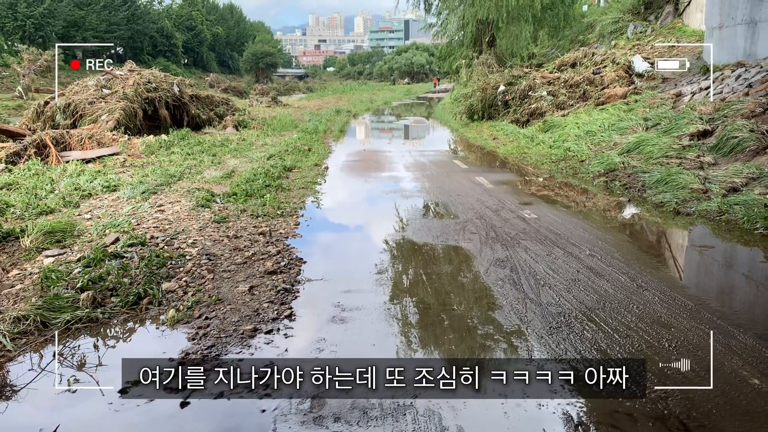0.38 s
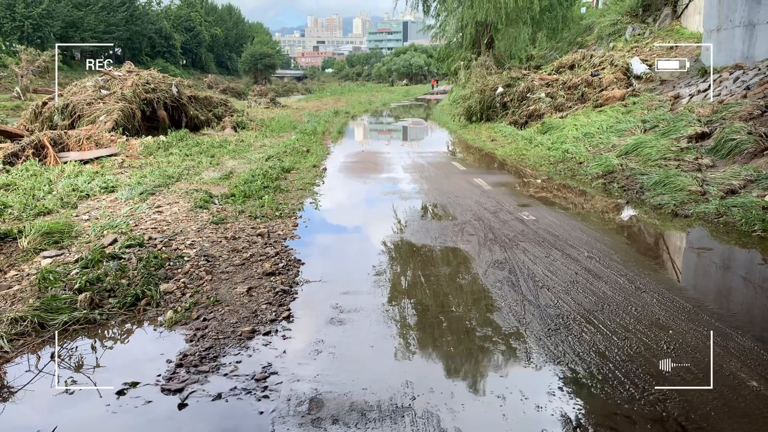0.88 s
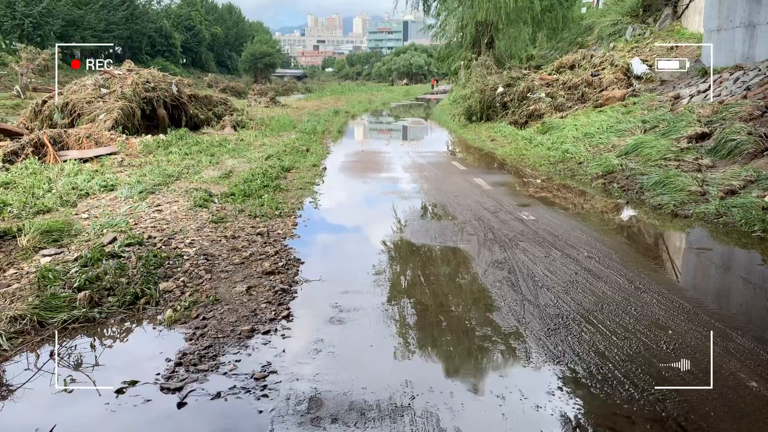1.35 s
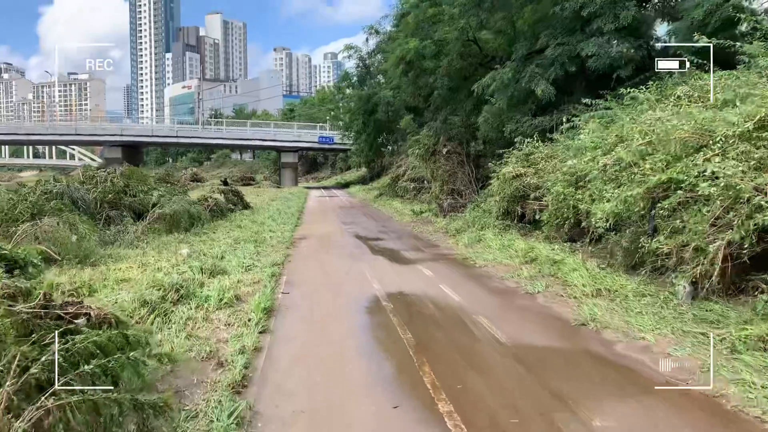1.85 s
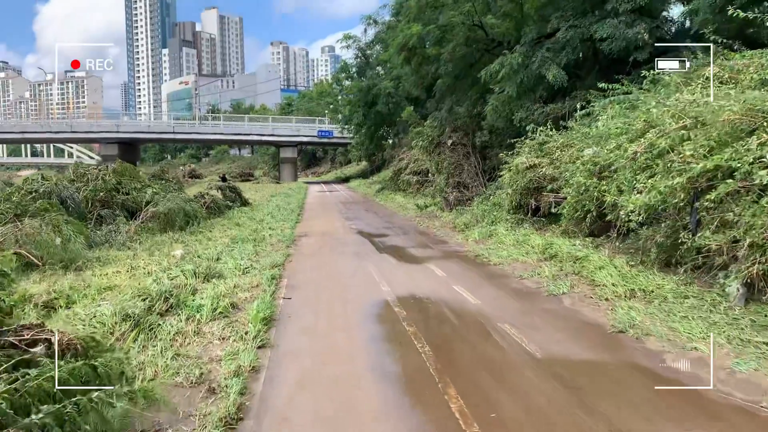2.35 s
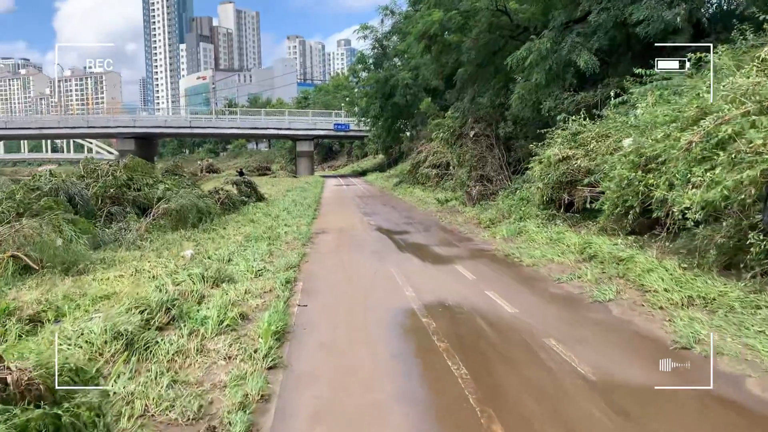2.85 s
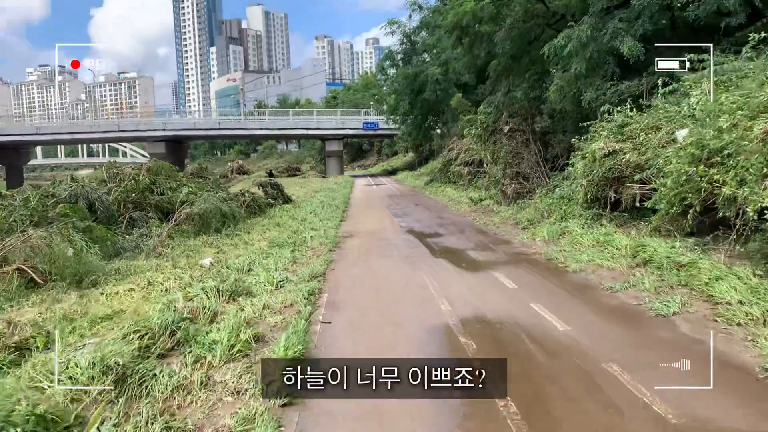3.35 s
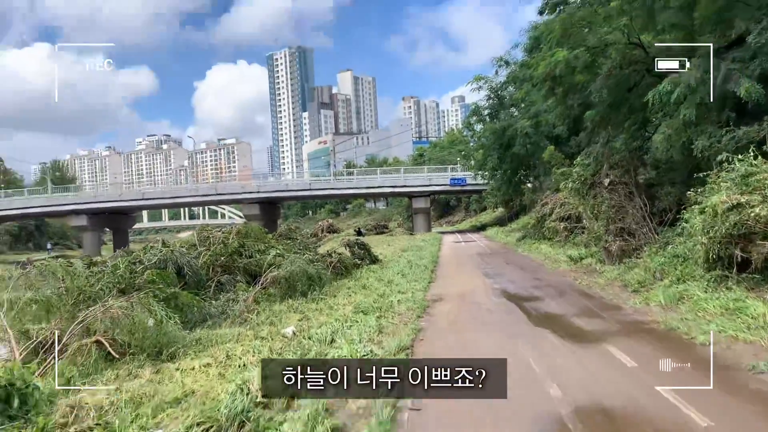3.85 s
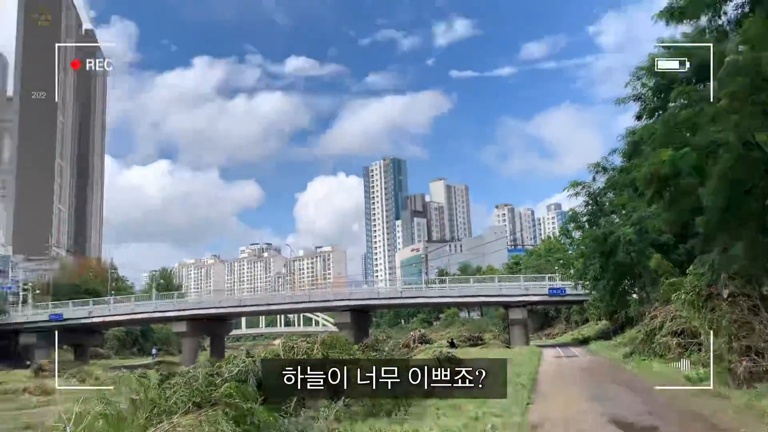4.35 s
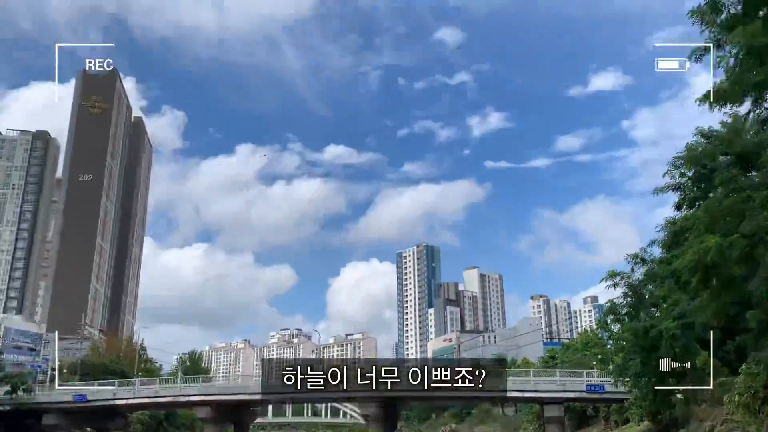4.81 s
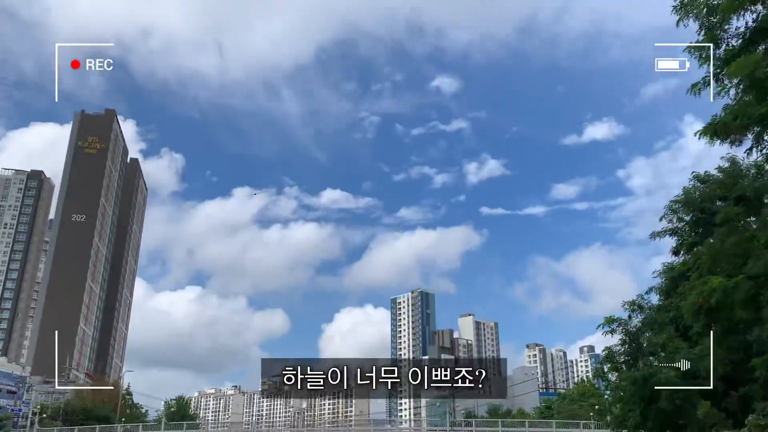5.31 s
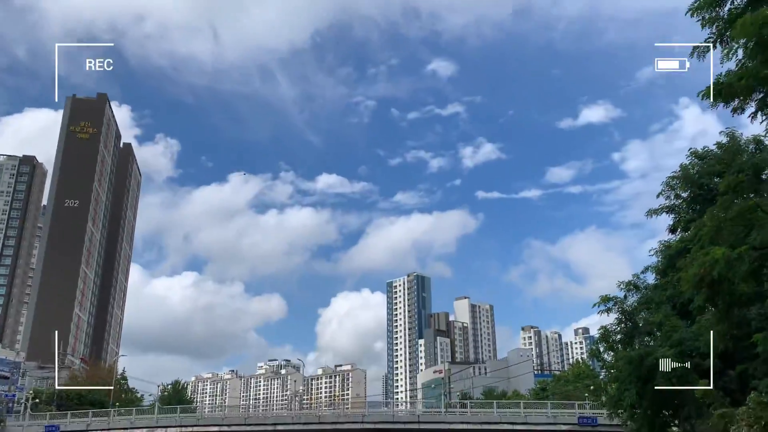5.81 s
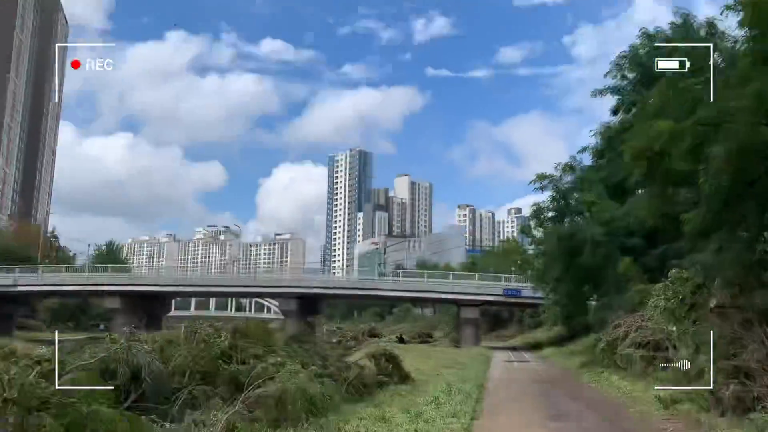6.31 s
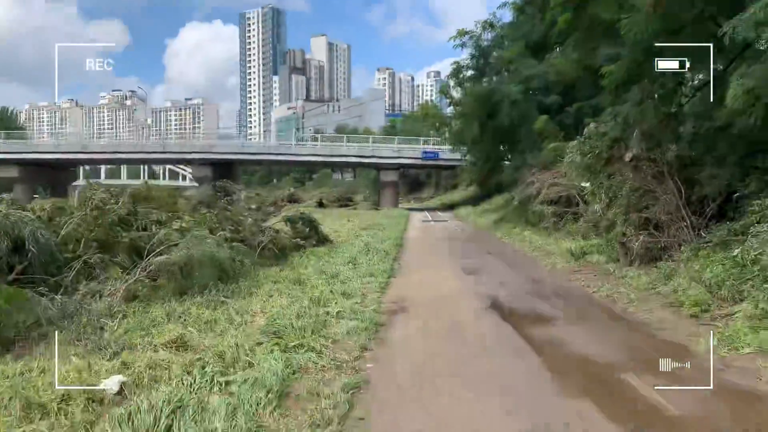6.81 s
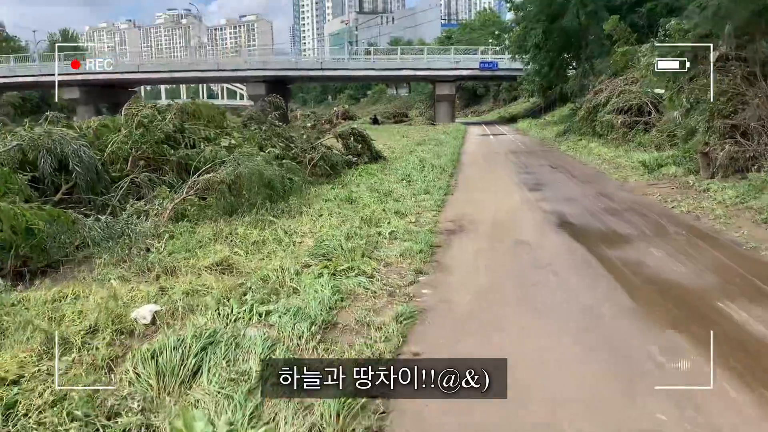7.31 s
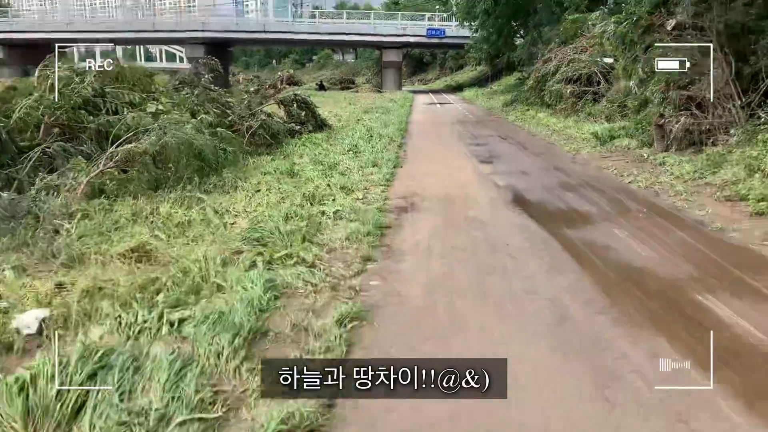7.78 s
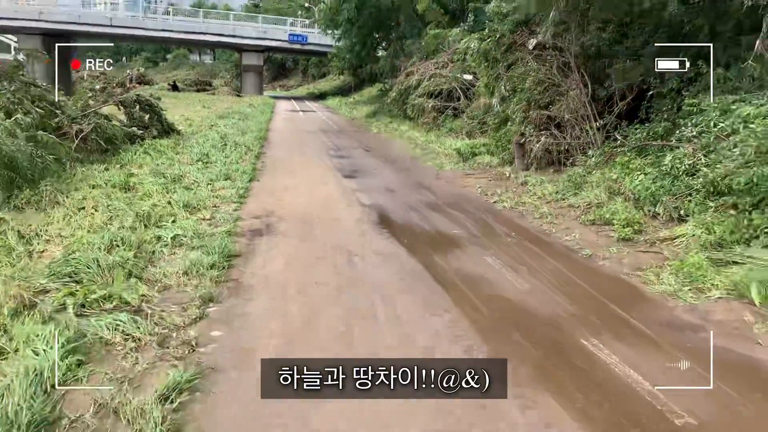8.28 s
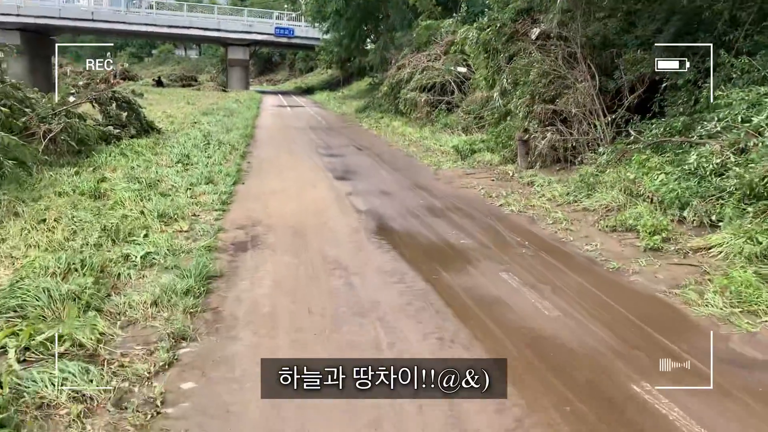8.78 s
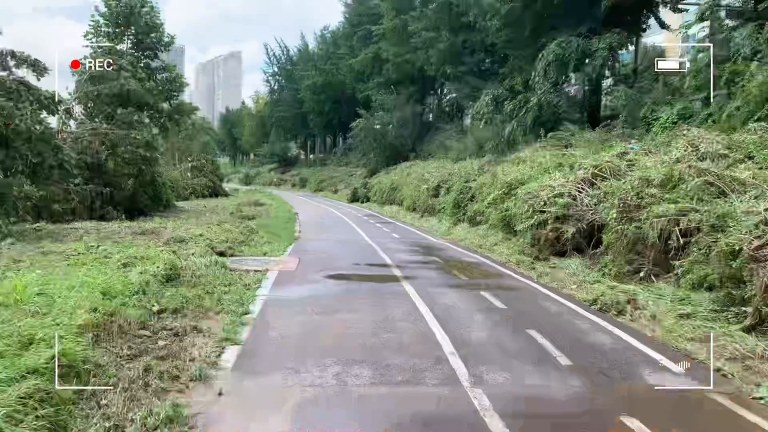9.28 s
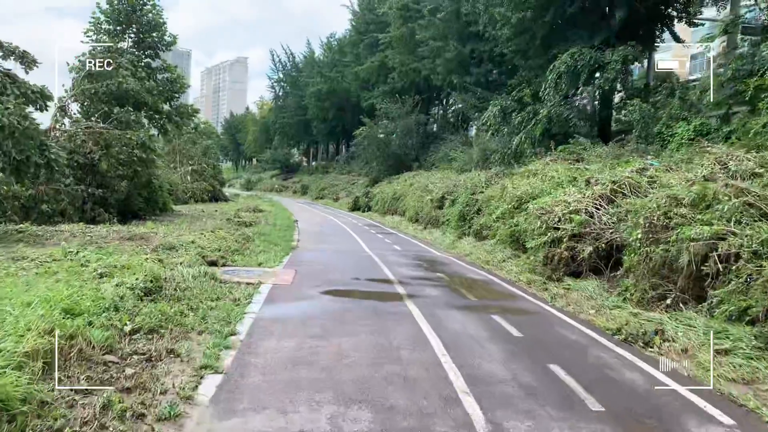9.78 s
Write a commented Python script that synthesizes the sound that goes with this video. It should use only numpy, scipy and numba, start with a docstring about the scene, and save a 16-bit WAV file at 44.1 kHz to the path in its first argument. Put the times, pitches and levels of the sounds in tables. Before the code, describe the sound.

Outdoors on a tree-lined riverside path, a dense cicada chorus drones high and bright, one nearer singer throbbing rapidly. Deep town and traffic rumble swells softly beneath. A gritty shoe scuff opens the scene, with lighter ones soon after. A tiny gap at 1.5 seconds changes the tone slightly; at 9.3 the cicadas vanish, leaving low rumble and thin leaf rustle. One handheld microphone, same in both channels.

```python
"""A tree-lined riverside path near town: three shots joined by short silences, one microphone for both channels.
In the first two a cicada chorus drones from the trees, one singer near enough for its buzz to throb:
trains of clicks ring resonances, and echoes blur the far singers. Bands of noise make the town's rumble,
a faint hum in the first shot and grit under a shoe close by. In the last shot only the rumble
and a thin rustle of leaves remain."""
import sys
import numpy as np
from scipy import signal
from scipy.fft import rfft, irfft
from scipy.io import wavfile
from scipy.ndimage import uniform_filter1d
from numba import njit

SR = 44100
rng = np.random.default_rng(int(sys.argv[2]) if len(sys.argv) > 2 else 0)


def log_audio(samples):
    """Write samples as a 16-bit WAV file to the path given in sys.argv[1]."""
    # one column per channel
    frames = np.atleast_2d(samples).T
    # limit to full scale, then quantise
    limited = np.clip(frames, -1, 1)
    pcm = np.round(limited * 32767).astype(np.int16)
    wavfile.write(sys.argv[1], SR, pcm)


def makeup_ratio(level_db):
    """Linear amplitude ratio for a level in decibels (20 dB per factor of ten)."""
    decades = np.asarray(level_db, float) / 20
    return 10 ** decades


N = 436590
T = np.arange(N) / SR
F = np.fft.rfftfreq(N, 1 / SR) + 1e-3  # Hz, kept above zero for the logarithm

# The three shots: (start [s], end [s], fade-out [s])
SHOTS = [(0, 1.5353, .0004), (1.5477, 9.273, .005), (9.2795, 9.9, .0004)]
# The walker on the path: (time [s], chorus level [dB], microphone lifted from path to sky [0-1])
WALKER = [(0, 1.5, 0.24), (.5, 1, 0.25), (1.53, 0, 0.27), (1.55, -1, 0.27), (2.6, -1, 0.2),
          (3.1, -0.5, 0.3), (3.6, 0.5, 0.9), (4.1, 0.3, 1), (5.2, 0, 0.96), (6.2, 0, 1), (6.7, 1, 0.84),
          (7.2, -0.5, 1), (7.7, -1, 0.84), (8.2, -0.8, 0.03), (8.8, -1.5, 0), (9.27, -0.3, 0)]
# Rings of a cicada's drum and hollow belly, before the walker's changes: (centre in first shot [Hz],
# centre in second [Hz], level in first [dB], level in second [dB], change with microphone to the sky [dB])
CICADA_RINGS = [(3820, 3558, -43.5, -41.5, -6.5), (4650, 4500, -42, -39.5, 0), (6100, 6110, -38.5, -37, 1),
                (7350, 7570, -42.5, -43.5, -2.5), (8020, 8150, -45.5, -49, -1),
                (9620, 9180, -40.5, -44.5, -0.5), (10770, 10200, -47, -44, -0.5),
                (13200, 13070, -56.5, -55, 0.5)]
# Width of each ring, for one pass of the resonance: (first shot [Hz], second shot [Hz])
RING_WIDTHS = [(1190, 545), (950, 840), (1720, 2060), (900, 1100), (350, 500), (1600, 2700), (1200, 2600),
               (3200, 2000)]
# The near singer's share of the drone's power, before each ring's gain: (time [s], share [0-1])
NEAR_SHARE = [(0, 0.26), (1.5, 0.27), (1.6, 0.2), (4, 0.28), (5.5, 0.33), (7, 0.21), (8, 0.16), (9.3, 0.16)]
# How far the near singer stands out, as a gain on that share, one per ring: (gain [dB])
NEAR_GAINS = [-5.5, 3, 0.5, 3, -3, -3, -1, -2]
# A shriller singer joins for a while: (start [s], length [s], level [dB], centre [Hz])
SHRILL_SINGER = [(.1, 1.4, -50, 8240), (6.796, 1.3, -43.5, 8310)]
# Grit under a shoe: (time halfway up the rise [s], peak level [dB], centre [Hz], width [Hz], rise [s])
SCUFFS = [(-.005, -38, 2200, 300, .012), (-.005, -41, 2430, 250, .011), (-.003, -43, 1830, 250, .014),
          (.03, -45, 2250, 450, .011), (.648, -50, 1800, 500, .004), (.66, -48, 2300, 600, .005),
          (.67, -50, 2000, 500, .004), (.776, -50, 2200, 1000, .007), (.785, -47, 1300, 1500, .0015),
          (8.136, -46.5, 1620, 400, .0035), (8.143, -50, 880, 250, .005)]
# Town level in each shot, before swells, sky and breeze:
# (deep drone [dB], upper drone [dB], low roar [dB], high roar [dB])
TOWN_LEVELS = [(-36.5, -34, -37, -46.5), (-35, -40, -38.5, -50.5), (-36.5, -46.5, -41.5, -47)]
# Brief swells of the drones and low roar: (time [s], peak level added [dB],
# time from peak to 1/e of power [s], layer [0 deep drone, 1 upper drone, 2 low roar])
DRONE_AND_ROAR_SWELLS = [(.96, -33, 0.12, 0), (1.6, -36, .12, 0), (3.1, -27, 0.14, 0),
                         (3.73, -30, 0.067, 0), (4.1, -37, 0.16, 0), (5.65, -29.5, 0.11, 0),
                         (6.1, -26.5, 0.14, 0), (6.9, -44, 0.44, 0), (7.8, -28, 0.13, 0),
                         (8.282, -29, 0.032, 0), (9.07, -43, 0.058, 0), (.1, -38, 0.27, 1),
                         (1.34, -50, 0.1, 1), (1.85, -37, 0.62, 1), (3.3, -35.5, 0.11, 1),
                         (4.1, -30, 0.15, 1), (4.72, -33.5, 0.11, 1), (5.2, -31.5, 0.14, 1),
                         (6.3, -32, 0.069, 1), (7.3, -36, 0.13, 1), (7.86, -39, 0.11, 1),
                         (8.5, -41, 0.1, 1), (8.862, -37.5, 0.1, 1), (9.3, -37, 0.066, 1),
                         (9.69, -35.5, 0.067, 1), (7.3, -41.5, 0.62, 2), (9.2, -42.5, 0.079, 2)]
# Engine drones: (centre in first, second and third shot [Hz], width [Hz])
ENGINE_DRONES = [(52.8, 50.6, 54.3, 16.7), (84, 74, 86, 25.4)]
# Colour of roar and rustle, and near 3050 Hz in the second shot the cicadas' lower skirt,
# one list per shot: (frequency [Hz], gain [dB])
ROAR_COLOURS = [
    [(59, -34), (100, -10), (180, -2), (285, -13.5), (409, -14), (477, -19.5), (639, -23), (900, -29.5),
     (1100, -35), (2000, -36), (2800, -43), (3640, -51), (6160, -120)],
    [(59, -35), (100, 2.5), (146, -5), (177, -5), (366, -14.5), (540, -19.5), (1010, -23), (1500, -28.5),
     (2000, -29.5), (2300, -32.5), (2600, -33), (2800, -31), (3050, -25), (3300, -30), (3640, -33),
     (6160, -120)],
    [(59, -37.5), (100, -2.5), (118, -12.5), (172, -16.5), (328, -23.5), (412, -33), (467, -22.5),
     (638, -32), (679, -28.5), (890, -28.5), (1300, -32), (1900, -36.5), (2300, -42), (3100, -44),
     (3900, -41.5), (4850, -42), (5150, -47), (6500, -45), (7000, -50), (7900, -50), (8100, -42),
     (8800, -47), (10500, -54), (11300, -64), (14500, -64)],
]
# Leaves in the last shot as the breeze drops: (time [s], change of the high roar [dB])
BREEZE = [(9.28, -2.5), (9.45, -1), (9.6, -4.5), (9.9, -3.5)]
# A machine somewhere near the first shot: (centre [Hz], width [Hz], level [dB])
MACHINE_HUM = [(151, 34, -44.5), (176, 10.4, -47), (398, 5.5, -52.5)]
# Overall response, weak in deep bass, with two narrow treble notches: (frequency [Hz], gain [dB])
RESPONSE = [(20, -23), (38, -3), (50, 0), (11000, 2.5), (11500, -0.5), (11650, -18), (11780, -43),
            (11900, -40), (12020, -24), (12150, -10), (12500, -1), (14300, 1), (14550, 0), (14750, -60),
            (15200, -60), (15300, -16), (15690, -8)]

THROB_HZ, RIBS = 42.78, 6  # muscle pulls per second, drum ribs buckling in each pull


def cicadas():
    """Far singers merge to a hiss combed by the wet path; the near one keeps its throb in every ring."""
    near = clicks(THROB_HZ, wander=0.0016, jitter=0.00014, lean=0.2)
    crowd = 0
    for pull_hz in THROB_HZ * rng.uniform(0.8, 1.25, size=8):
        crowd = crowd + makeup_ratio(0.48 * walk(2.6)) * clicks(pull_hz, wander=0.0051, jitter=0.00002, lean=0.43)
    common_swell = walk(5.6)
    chorus_db, sky = curves(WALKER)
    near_share = curves(NEAR_SHARE)[0]
    chorus = 0
    for row, width, near_db in zip(CICADA_RINGS, RING_WIDTHS, NEAR_GAINS):
        first_hz, second_hz, first_db, second_db, sky_db = row
        # Each ring gets echoes of its own
        far = unit(echoes(crowd, seconds=0.023, rate=7, count=5) + makeup_ratio(-3.5) * rng.standard_normal(N))
        far = wet_path(far)
        share = np.clip(near_share * makeup_ratio(near_db), 0, 1)
        drone = np.sqrt(1 - share) * far + np.sqrt(share) * scatter(near, seconds=0.0077)
        hz = by_shot([first_hz, second_hz]) * (1 + 0.009 * walk(1.143))
        level_db = by_shot([first_db, second_db]) + chorus_db + sky_db * sky
        flutter_db = 0.15 * walk(1.6) + 0.5 * common_swell + 0.14 * walk(18)
        chorus = chorus + makeup_ratio(level_db + flutter_db) * unit(ring(drone, hz, by_shot(width)))
    chorus = chorus + shrill_singer(far)
    # Small drums radiate little below 2860 Hz
    high_pass = signal.butter(4, 2860, "high", fs=SR, output="sos")
    return signal.sosfilt(high_pass, chorus) * (T < SHOTS[1][1])


def clicks(hz, wander, jitter, lean):
    """One singer: drum ribs buckle in turn, the first hardest, once for each pull of the muscle."""
    phase = np.cumsum(hz * RIBS * (1 + wander * walk(2)) / SR) + rng.random() * RIBS
    at = np.flatnonzero(np.diff(np.floor(phase)))
    size_chance, time_chance = rng.standard_normal((len(at), 2)).T
    rib = np.floor(phase[at + 1]) % RIBS
    size = np.exp(-lean * rib) * makeup_ratio(2.0 * size_chance)
    sample = np.clip(at + jitter * SR * time_chance, 0, N - 1).astype(int)
    out = np.zeros(N)
    np.add.at(out, sample, size)
    return unit(out)


def echoes(x, seconds, rate, count):
    """Echo patterns of bank and trees trade places as the walker moves: strands come and go, the sum holds level."""
    t = np.arange(int(4 * seconds * SR)) / SR
    weights = np.array([walk(rate) for _ in range(count)])
    paths = []
    for _ in range(count):
        tail = rng.standard_normal(len(t)) * np.exp(-t / seconds)
        paths.append(signal.oaconvolve(x, tail)[:N])
    return unit(np.sum(weights * paths, axis=0) / np.sqrt(np.sum(weights ** 2, axis=0)))


def wet_path(far):
    """The wet path mirrors the chorus: a delayed copy combs it, drifting as the walker moves."""
    delay = rng.uniform(0.002, 0.004) + 0.00014 * walk(4.5)  # s
    return unit(far + makeup_ratio(-7) * np.interp(T - delay, T, far))


def scatter(x, seconds):
    """Leaves and ground smear each click into a short tail of fresh noise."""
    keep = np.exp(-1 / (seconds * SR))
    power = signal.lfilter([1], [1, -keep], x ** 2)
    return unit(np.sqrt(power) * rng.standard_normal(N))


def shrill_singer(far):
    """A shriller singer rings the far hiss in one narrow band, fading in and out."""
    out = 0
    for start, length, db, hz in SHRILL_SINGER:
        fade = np.clip(np.minimum(T - start, start + length - T) / 0.2, 0, 1)  # 0.2 s each way
        out = out + makeup_ratio(db) * fade * unit(ring(far, hz, 420))
    return out


def scuffs():
    """Grit close to the microphone: short bursts of ringing noise, quick to rise and slower to fade."""
    out = 0
    for s, db, hz, width, rise in SCUFFS:
        u = np.clip((T - s) / rise + 0.5, 0, 20)
        out = out + makeup_ratio(db) * u * np.exp(1 - u) * unit(ring(rng.standard_normal(N), hz, width))
    return out


def traffic():
    """Town rumble: brief swells add power to the engine drones and to the low roar."""
    deep_db, upper_db, low_db, high_db = (by_shot(column) for column in np.transpose(TOWN_LEVELS))
    low_db = low_db - 1.5 * curves(WALKER)[1]  # softer as the microphone faces the sky
    power = [makeup_ratio(deep_db) ** 2, makeup_ratio(upper_db) ** 2, makeup_ratio(low_db) ** 2]
    for s, db, length, layer in DRONE_AND_ROAR_SWELLS:
        swell = makeup_ratio(db) ** 2 * np.exp(-((T - s) / length) ** 2)
        power[round(layer)] = power[round(layer)] + swell
    high_db = high_db + curves(BREEZE)[0] * (T > SHOTS[2][0])
    low_roar = roar(np.sqrt(power[2]), 113 * 2 ** np.arange(0, 2.1, 0.5))
    high_roar = roar(makeup_ratio(high_db), 640 * 2 ** np.arange(0, 4.6, 0.5))
    return engine_drones(power) + low_roar + high_roar


def engine_drones(power):
    """Engines on the bridge blur to two low drones: noise through narrow, wandering resonances."""
    out = 0
    for (*shot_hz, width), drone_power in zip(ENGINE_DRONES, power):
        hz = by_shot(shot_hz) * (1 + 0.036 * walk(2.0))
        out = out + np.sqrt(drone_power) * unit(ring(rng.standard_normal(N), hz, width))
    return out


def roar(gain, centres_hz):
    """Tyres, water and leaves: half-octave-spaced noise bands flicker alone, coloured for each shot."""
    bands = 0
    for hz in centres_hz:
        flicker = makeup_ratio(1.3 * walk(7))
        bands = bands + flicker * unit(ring(rng.standard_normal(N), hz, hz / 2)) * np.sqrt(hz)
    out = 0
    for (start, end, _), points in zip(SHOTS, ROAR_COLOURS):
        coloured = unit(irfft(rfft(bands) * colour(points), N))
        out = out + gain * coloured * (T > start - 0.004) * (T < end + 0.002)
    return out


def hum():
    """A machine's hum: noise through three narrow resonances gives wavering tones."""
    out = 0
    for hz, width, db in MACHINE_HUM:
        out = out + makeup_ratio(db) * unit(ring(rng.standard_normal(N), hz, width))
    return out * (T < SHOTS[0][1])


def ring(x, hz, width):
    """A resonance applied twice, so its flanks fall steeply."""
    g = np.tan(np.pi * hz / SR) + np.zeros(N)
    k = width / hz + np.zeros(N)
    return svf(svf(x, g, k), g, k)


@njit
def svf(x, g, k):
    """State-variable band-pass whose centre may move every sample."""
    y, b, l = np.empty(len(x)), 0., 0.
    for i in range(len(x)):
        v = (b + g[i] * (x[i] - l)) / (1 + g[i] * (g[i] + k[i]))
        b, l, y[i] = 2 * v - b, l + 2 * g[i] * v, k[i] * v
    return y


def walk(rate):
    """Random levels, rate of them a second, slewed twice; spread near 1."""
    k = int(SR / rate)
    held = np.repeat(rng.standard_normal(N // k + 1), k)
    return 1.5 * uniform_filter1d(uniform_filter1d(held, k), k)[:N]


def colour(points):
    """Gain over frequency, from (frequency [Hz], gain [dB]) points."""
    hz, db = np.transpose(points)
    return makeup_ratio(np.interp(np.log(F), np.log(hz), db))


def curves(table):
    """Columns of (time [s], value, ..) rows, drawn sample by sample."""
    s, *columns = np.transpose(table)
    return [np.interp(T, s, column) for column in columns]


def by_shot(values):
    """One value held through each shot; the last holds to the end."""
    ends = [end for _, end, _ in SHOTS[:len(values) - 1]]
    return np.asarray(values)[np.searchsorted(ends, T)]


def unit(x):
    """Scale to rms 1."""
    return x / np.sqrt(np.mean(x ** 2))


def scene():
    """Trees, town, machine and shoe all reach one microphone, heard in both channels."""
    return np.tile(cicadas() + traffic() + hum() + scuffs(), (2, 1))


def low_pass(x):
    """Removes everything above the highest recorded frequency."""
    return signal.sosfilt(signal.butter(12, 15700, fs=SR, output="sos"), x)


def record(dry):
    """The overall response is weak in deep bass and has two treble notches; gaps join the shots."""
    heard = irfft(rfft(dry) * colour(RESPONSE), N)
    shots_on = 0
    for start, end, fade in SHOTS:
        fade_in = np.clip((T - start) / 0.002 + 0.5, 0, 1)
        shots_on = shots_on + fade_in * np.clip((end - T) / fade, 0, 1)
    return low_pass(heard * shots_on)


dry = scene()
out = record(dry)
log_audio(out)
```